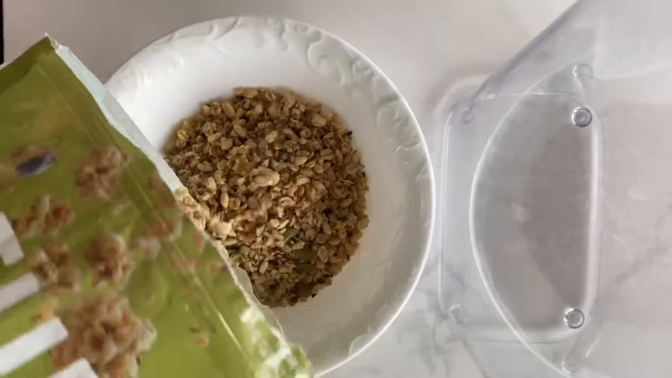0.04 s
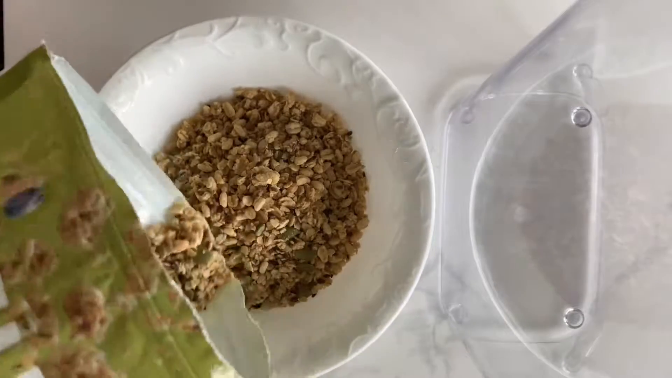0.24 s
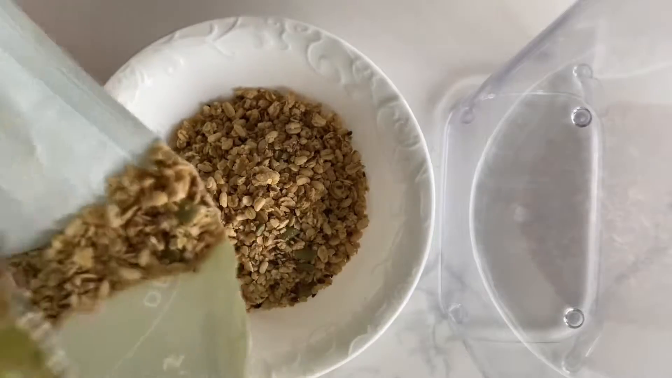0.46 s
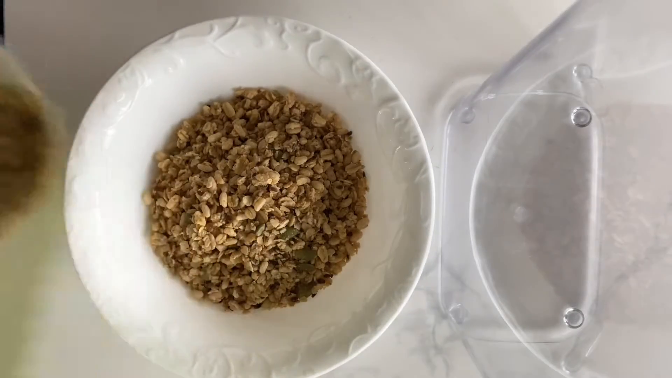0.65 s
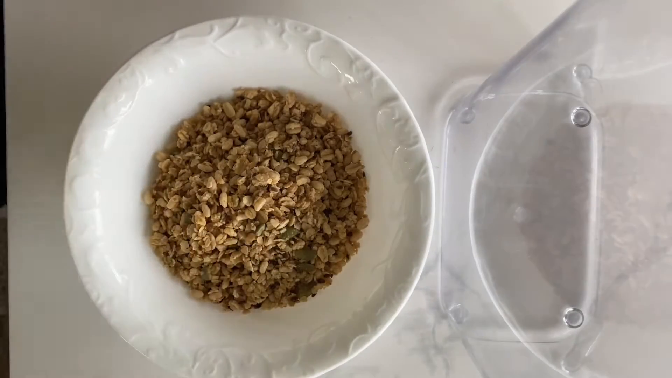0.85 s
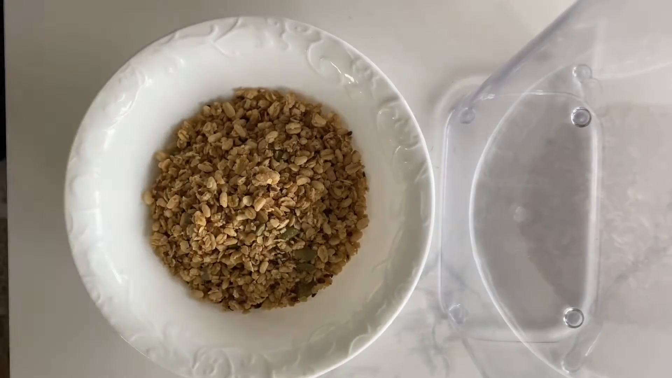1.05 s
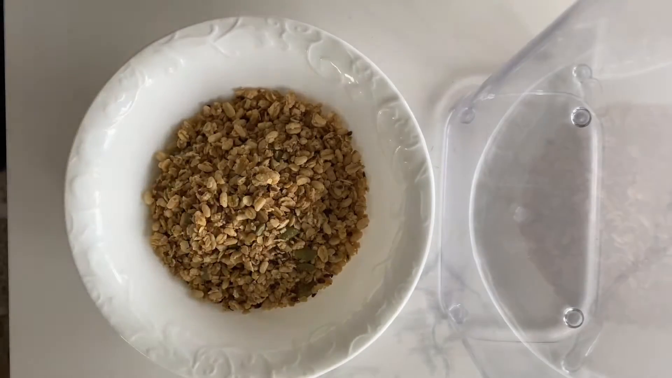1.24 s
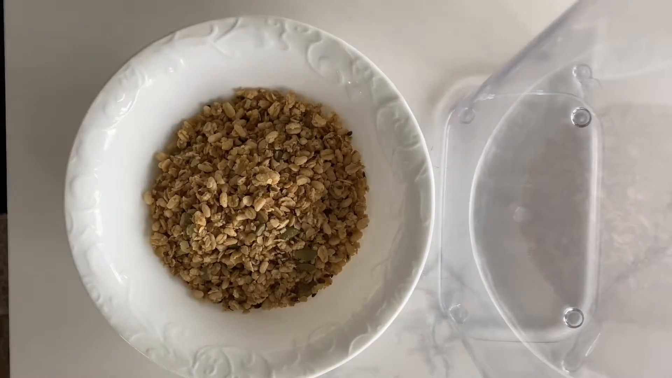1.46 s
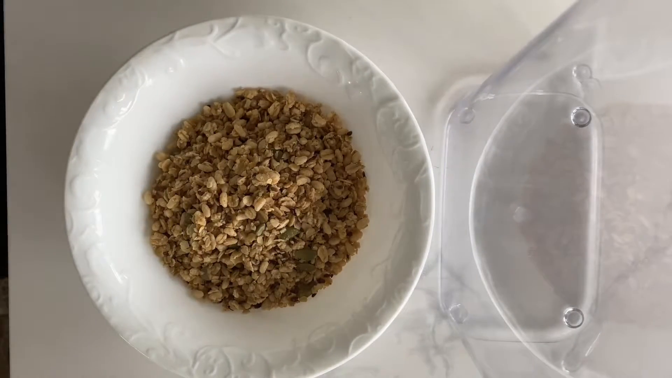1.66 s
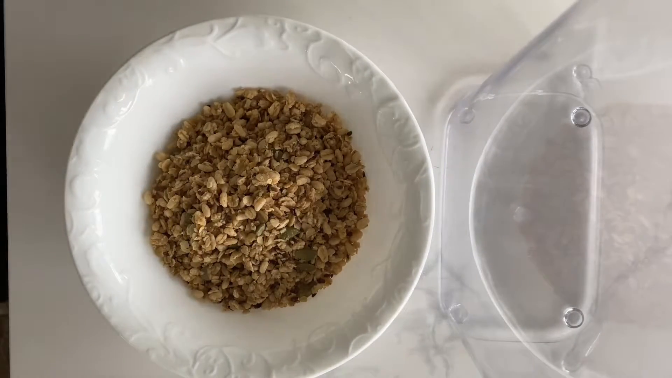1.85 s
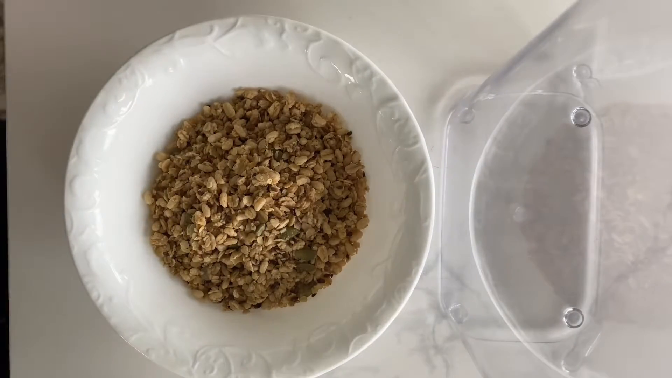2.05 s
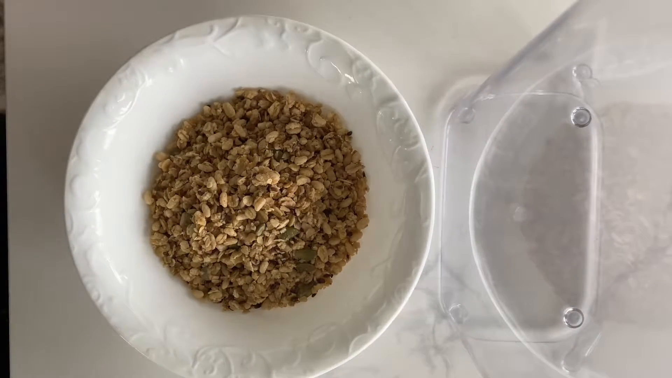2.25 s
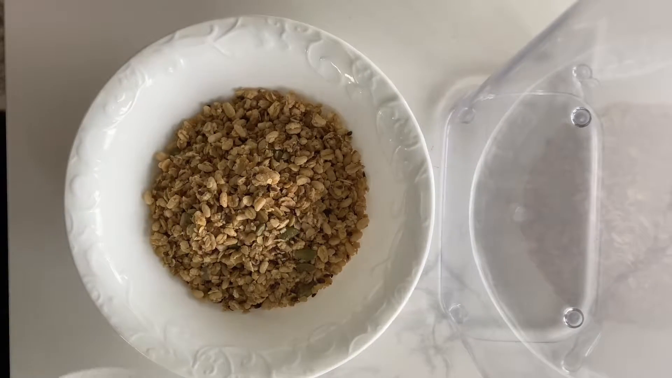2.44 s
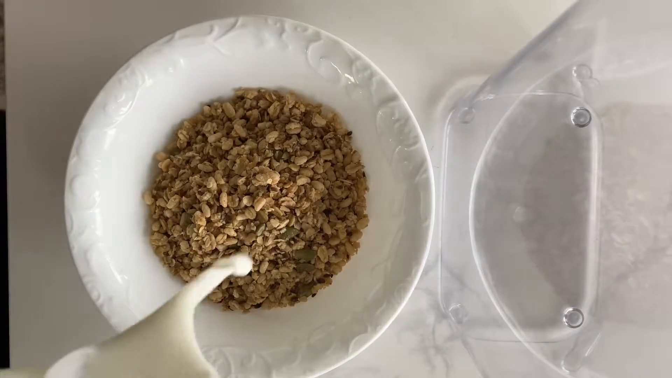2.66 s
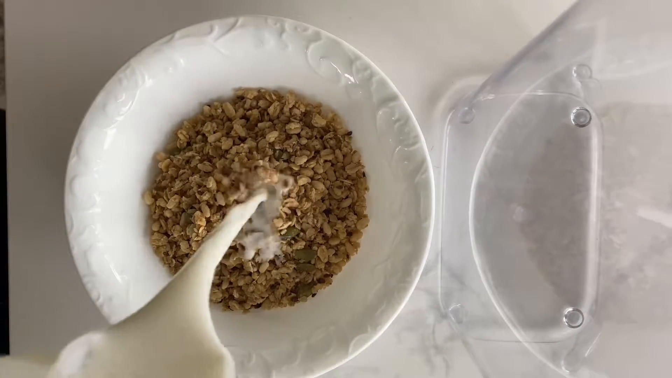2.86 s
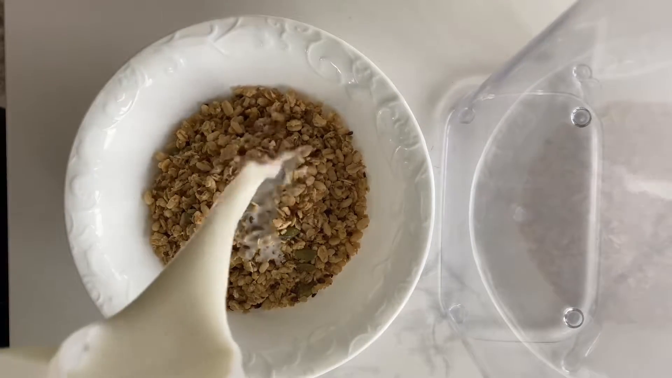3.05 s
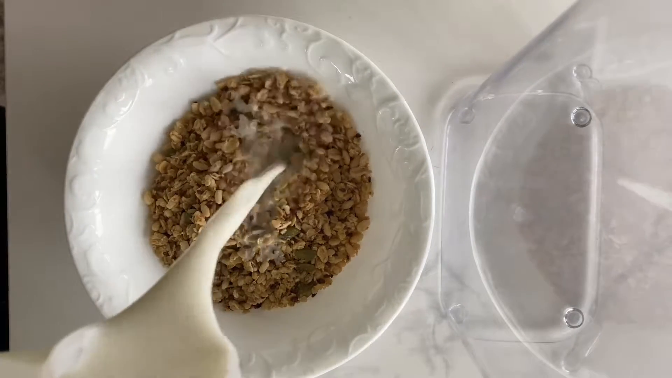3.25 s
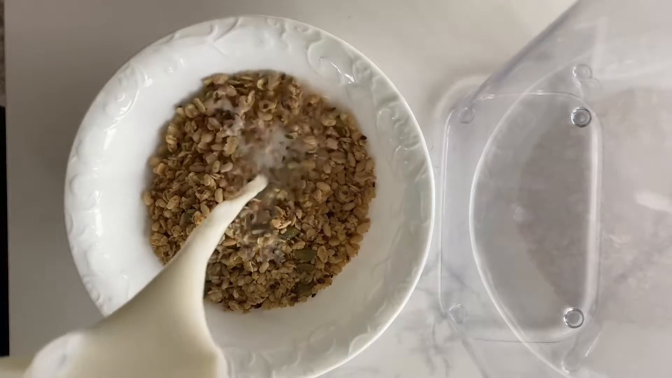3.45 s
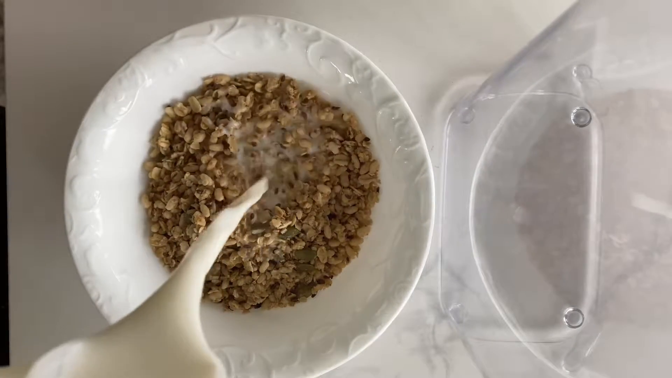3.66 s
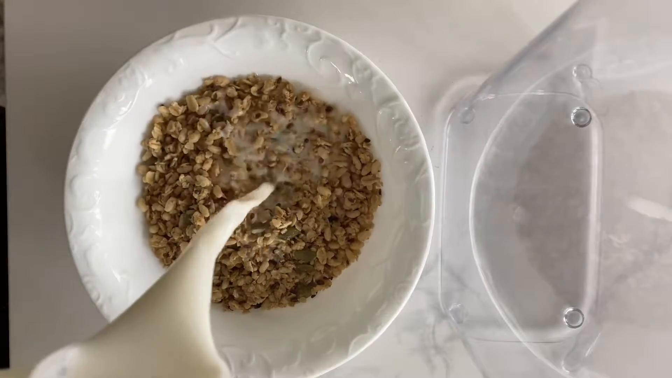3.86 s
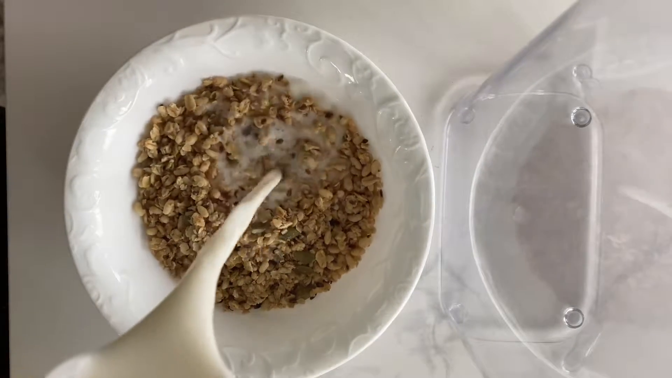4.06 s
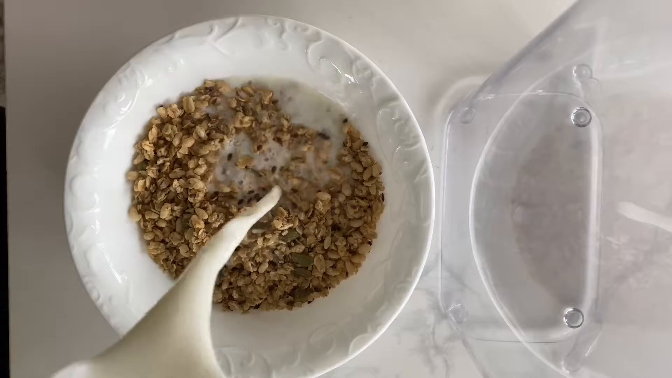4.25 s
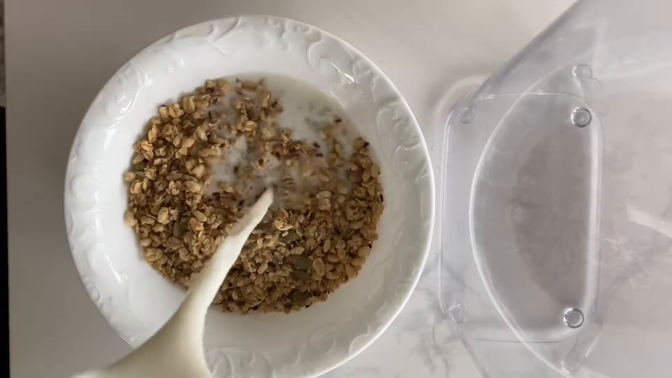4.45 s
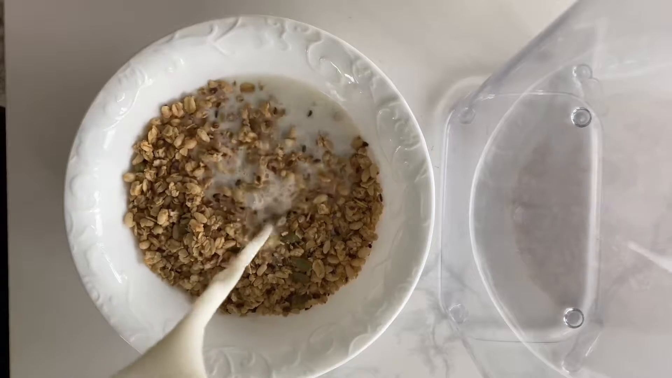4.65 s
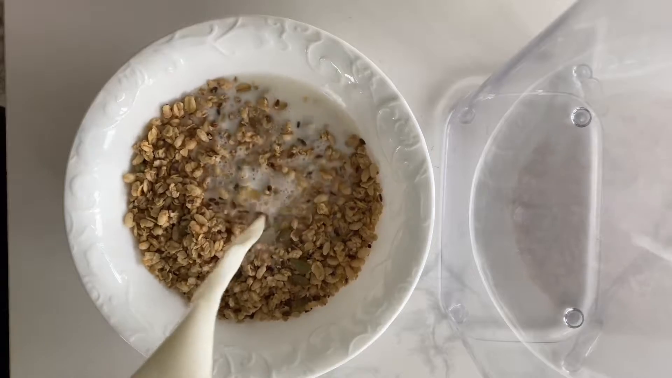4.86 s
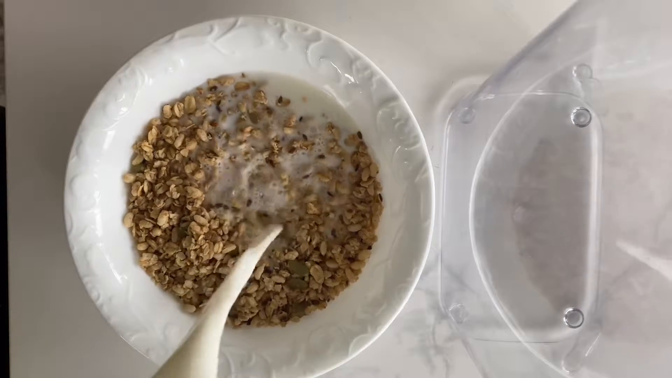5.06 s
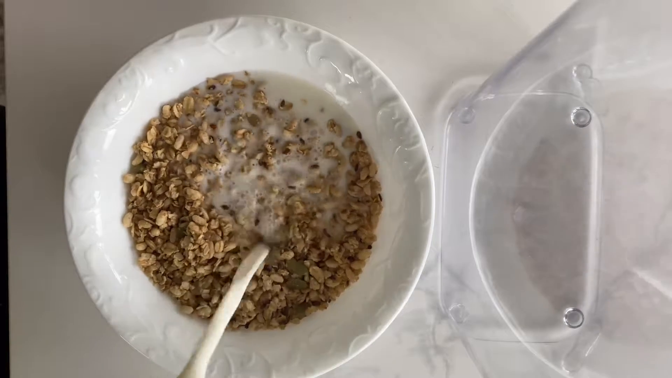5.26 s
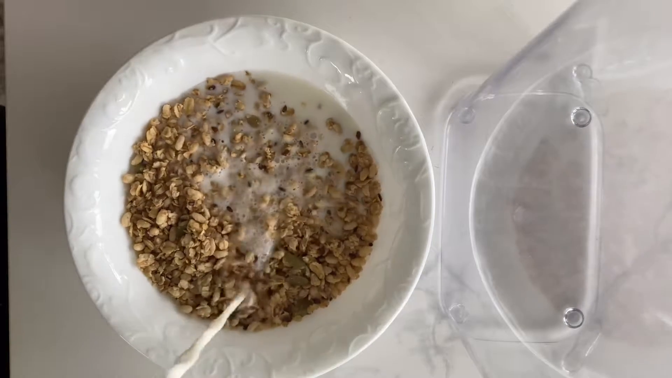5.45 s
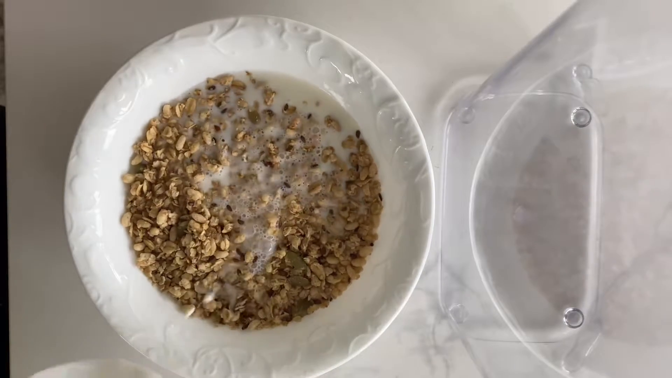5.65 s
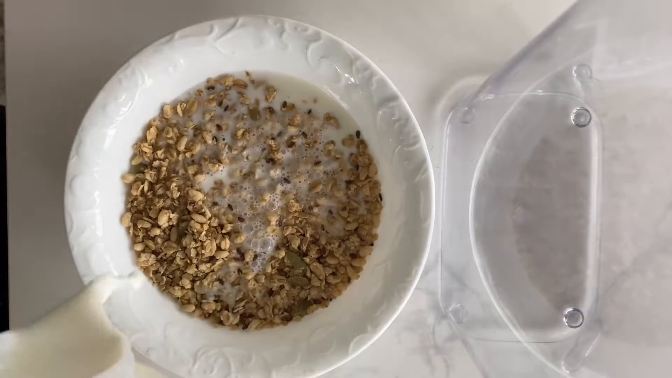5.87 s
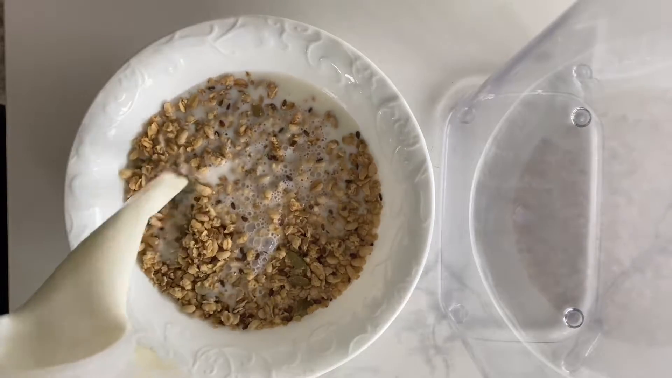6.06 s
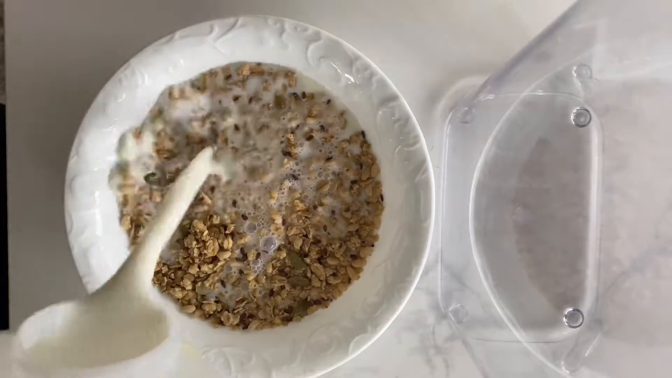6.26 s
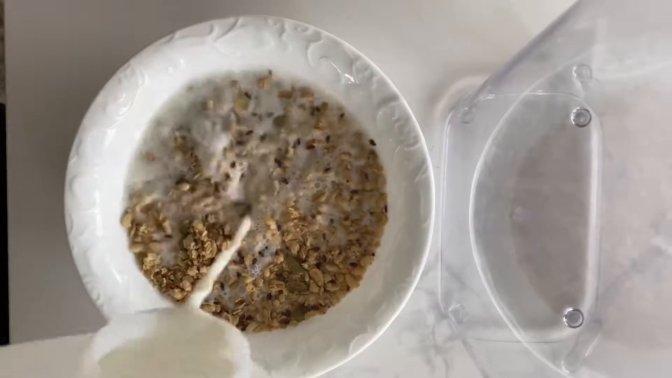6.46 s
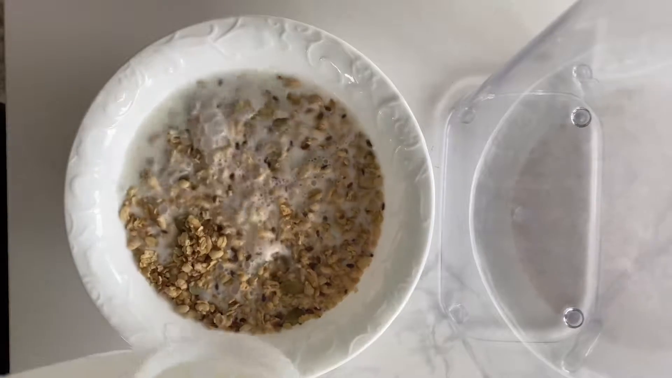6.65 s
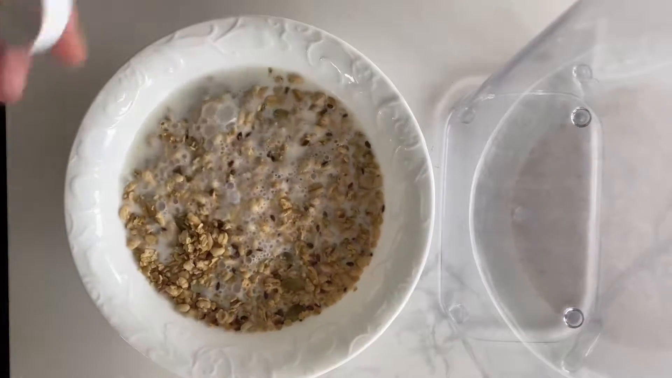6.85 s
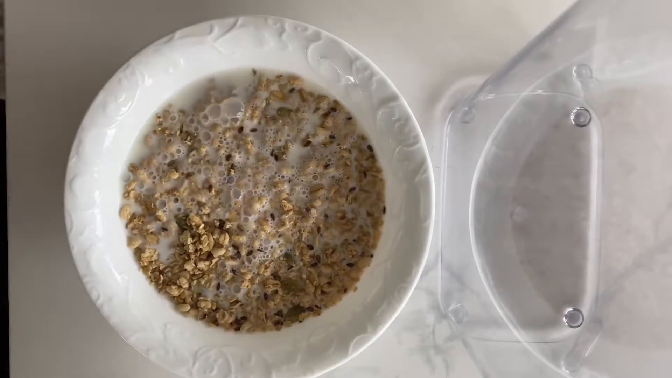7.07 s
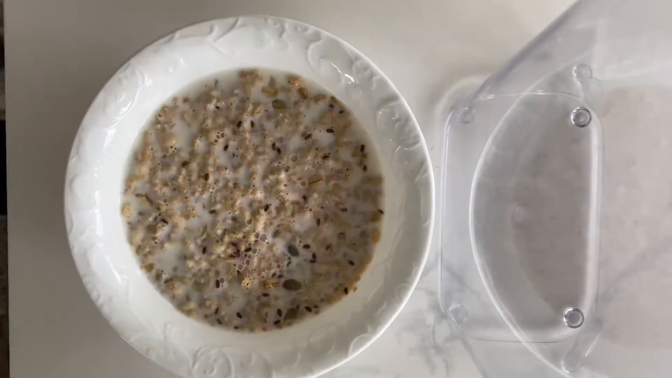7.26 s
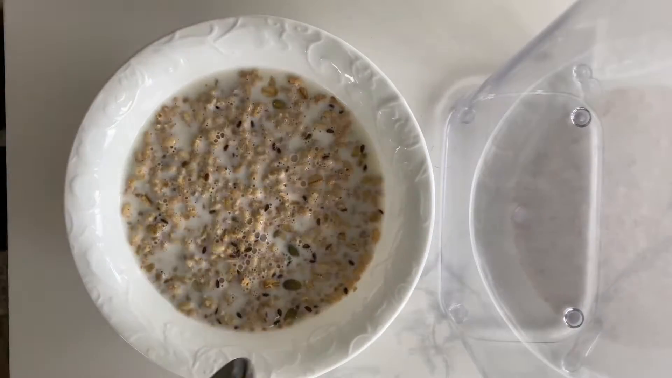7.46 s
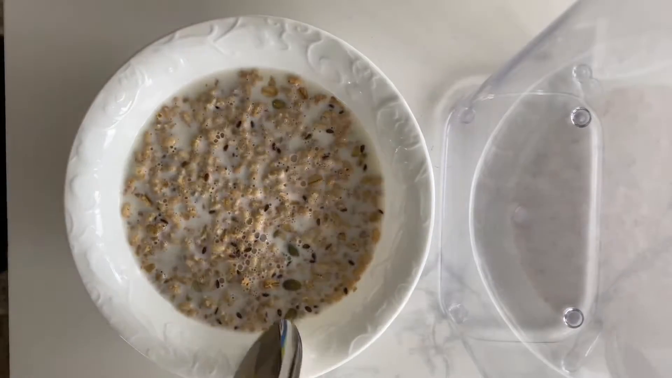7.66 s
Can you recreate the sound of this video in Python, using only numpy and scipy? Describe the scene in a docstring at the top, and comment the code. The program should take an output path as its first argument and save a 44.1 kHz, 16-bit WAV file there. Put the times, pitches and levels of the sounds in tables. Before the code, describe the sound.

Close dry rustle and crackly knocks of a granola bag, sudden quiet, milk bubbling through cereal in a bowl, then a quick clinking spoon.

```python
"""Granola rattles and thuds down a foil pouch, close by, then breaks off dead at 2 s; milk fizzes, bubbles and snaps
through flakes in a bowl in two pours; soft low bumps and a spoon's clinks end it, over room murmur and far engines.
Granola and milk are clouds of tiny noise grains, shaped in bands and colored by resonances of pouch, flakes and bowl.
Knocks, bubbles and bursts are short damped rings with noise; the spoon is a set of modes struck with a clatter.
Engines are faint sines, gliding or steady, the murmur is colored noise with hum; a two-port model makes it stereo."""
import sys
import numpy as np
from scipy import signal
from scipy.fft import rfft, irfft
from scipy.io import wavfile

SR = 44100
rng = np.random.default_rng(int(sys.argv[2]) if len(sys.argv) > 2 else 0)


def log_audio(samples):
    """Write samples as a 16-bit WAV file to the path given in sys.argv[1]."""
    # one column per channel
    frames = np.atleast_2d(samples).T
    # limit to full scale, then quantise
    limited = np.clip(frames, -1, 1)
    pcm = np.round(limited * 32767).astype(np.int16)
    wavfile.write(sys.argv[1], SR, pcm)


N = 340011
TIME = np.arange(N) / SR
FREQS = np.fft.rfftfreq(N, 1 / SR)
EDGE_HZ = 15950  # top of the whole mix
POUCH_END_S = 2.0
SILENT_DB = -200

# All levels below stand before the trims, resonances, echoes and stereo shading added further on.

# Color of the room murmur. Each row: frequency in Hz, density in dB per Hz, relative.
ROOM_COLOR = [(20, -21), (55, -1), (100, -3), (230, -4.5), (330, -17), (700, -20), (1500, -29.5),
              (4000, -34), (8000, -39.5), (15500, -53)]
# Drift of the room murmur and hum. Each row: time in seconds, gain in dB.
MURMUR_LEVEL = [(2.4, 1), (3.7, -0.5), (4.6, -3.5), (5.2, 0), (6.3, 2.5), (6.65, 1), (6.8, -2), (7.2, -1)]
# Faint kitchen hum. Each row: mean pitch in Hz, level in dB.
HUM_NOTES = [(167, -75), (203, -75), (263, -78)]
# Engines outside. Each row: start in seconds, length in seconds, pitch in Hz, climb in Hz per second, level in dB.
ENGINE_DRONES = [(0, 0.35, 215, 20, -57), (.41, 1.53, 169, 21.5, -52), (2, 0.85, 267.8, 0, -67),
                 (5.85, 0.86, 192.5, 4.5, -65.5)]
DRONE_FADE_S = 0.058

# The two microphone ports, three curves over frequency.
# Each row: frequency in Hz, phase in radians by which left leads.
LEFT_LEAD = [(0, 0), (300, .3), (650, 3.1), (1400, 4.3), (2200, 4.5), (3000, 7.3), (4000, 7.8), (5400, 9.5),
             (7000, 6.3), (9250, 3.1), (11100, 0), (13100, -3.1), (15200, -6.3)]
# Each row: frequency in Hz, left minus right in dB.
LEFT_LOUDER = [(60, 3), (200, 3), (700, 6), (1300, 6), (2400, 7), (4600, 8.5), (8000, 2.5), (9500, 0)]
# Each row: frequency in Hz, likeness of the two ports from 0 to 1.
PORT_LIKENESS = [(60, .8), (400, .7), (1200, .8), (2700, .5), (4500, .35), (6500, .6), (8200, .7),
                 (9300, .96)]

# Color of the granola in its pouch. Each row: frequency in Hz, density in dB per Hz, relative.
POUCH_COLOR = [(30, -5), (60, 11), (170, 2), (450, -11.5), (1000, -3), (1850, -6.5), (2700, -11),
               (3800, -8), (5400, -5), (8000, -15), (12000, -13), (15500, -19)]
# Granola sliding in the tilted pouch. Each row: start in seconds, hold in seconds, flow in dB, crispness in dB.
POUCH_SLIDES = [(0.02, 0.0093, -47.5, -1), (0.12, 0.0096, -50.5, -0.5), (0.255, 0.0083, -45, -2),
                (0.6, 0.22, -27, 1), (0.96, 0.082, -27.5, -10.5), (1.035, 0.027, -31.5, 1)]
# Jolts as the pouch is put down. Each row: start in seconds, hold in seconds, flow in dB, crispness in dB.
POUCH_JOLTS = [(1.436, 0.025, -23.5, -2), (1.523, 0.0025, -29.5, -18), (1.752, 0.0034, -32, -11.5)]
# Resonance of the air in the pouch, dropping as the granola slides back. Each row: time in seconds, pitch in Hz.
POUCH_AIR_PITCH = [(0.3, 1850), (0.799, 1750), (0.98, 1050)]
# Clumps landing and creases snapping in the pouch.
# Each row: start in seconds, thud in dB, pitch in Hz, cycles to swell, crack in dB.
POUCH_CLUMPS = [(0.030, -30, 1853, 1.5, -31), (0.256, -33, 1730, 1.3, -33), (0.489, -33.5, 840, 0.42, -47),
                (0.772, -10, 1360, 0.8, -10), (0.7872, -14, 1230, 0.39, -8.5), (1.011, -28, 1080, 2, -22),
                (1.0605, -12, 930, 1.5, -23.5), (1.2698, -26.5, 1812, 0.75, -24),
                (1.3028, -21, 907, 1.3, -8.5), (1.305, -28, 201, 0.24, -48.5),
                (1.433, -15.5, 2010, 0.86, -12), (1.4428, -17, 1980, 0.86, -4),
                (1.4625, -10, 1150, 1.3, -11), (1.524, -18, 410, 1.2, -25.5),
                (1.6465, -10, 885, 1.26, -26.5), (1.7465, -15, 1060, 1.3, -25),
                (1.7539, -13.5, 1040, 0.83, -19), (1.8154, -18, 1010, 1, -25.5),
                (1.9028, -17.5, 1040, 0.54, -41), (1.957, -25, 1190, 0.64, -42)]
HANDLING_DB = -59  # faint steady rustle of the held pouch
# The low thuds gain THUD_LAG dB less for each dB of flow above a gentle one.
THUD_LAG, GENTLE_DB = .17, -56.5

# Color of the milky drops. Each row: frequency in Hz, density in dB per Hz, relative.
MILK_COLOR = [(400, 2.5), (850, -15), (1400, -5.5), (2100, -0.5), (3300, -5.5), (4800, -0.5), (7000, -4),
              (8500, -1.5), (11500, -1.5), (15500, -7.5)]
# The two pours on the flakes. Each row: time in seconds, flow in dB, fizz in dB against the flow.
POUR_ONE = [(2.763, -64.5, 10), (2.95, -54.5, -1), (3.12, -54.5, 0), (3.29, -46.5, 1.5), (3.58, -54.5, 0.5),
            (3.92, -57, -1), (4.05, -49, -3.5), (4.25, -59, 2.5), (4.41, -53, 0.5), (4.9, -56, -5),
            (5.44, -51, 1), (5.62, -62, 5.5), (5.801, -86.5, 5)]
POUR_TWO = [(5.961, -73, 0.5), (6.05, -53, 3.5), (6.17, -50.5, -10), (6.24, -52, -1), (6.42, -49.5, -6),
            (6.57, -56, 0), (6.71, -72, -25), (6.92, -83, -11)]
POURS = POUR_ONE + POUR_TWO
# Each pour's gurgle starts low on dry flakes and comes up as they get wet.
DRY_DB, WETTING_S = -13, 0.36
# Lowest resonance of the wet gaps between flakes. Each row: time in seconds, pitch in Hz.
GAP_PITCH = [(2.77, 1240), (2.96, 1410), (3.2, 1340), (4.0, 1217), (5.35, 943), (5.62, 1350), (6.2, 850)]
# Resonance of the hole the stream digs as it moves over the heap. Each row: time in seconds, pitch in Hz.
CAVITY_PITCH = [(2.87, 2830), (3.08, 2550), (3.17, 1310), (5.5, 1460), (6.05, 2030), (6.45, 1950),
                (6.75, 1700)]
# First milk hissing on the dry heap. Each row: time in seconds, level in dB.
HISS_LEVEL = [(2.764, -67), (2.87, -52.5), (3.05, -54), (3.3, -46), (3.6, -67)]
# Air pockets bursting in the milk. Each row: start in seconds, level in dB, pitch in Hz, cycles to swell.
AIR_PLOPS = [(3.042, -37, 2870, 5.6), (3.323, -38, 1370, 1.9), (3.341, -33.5, 3930, 1.9),
             (3.683, -37, 1510, 2.6), (3.737, -33.5, 1406, 3.1), (4.002, -20, 1650, 0.44),
             (4.142, -37, 2010, 2.1), (4.165, -23.5, 2020, 0.43), (4.1806, -26, 1470, 0.53),
             (4.366, -31, 2240, 0.5), (4.42, -39, 1460, 1.2), (4.4998, -29, 3330, 0.58),
             (4.533, -34.5, 3880, 5.5), (4.69, -31, 1370, 1), (4.711, -34, 1490, 1.1),
             (4.852, -40.5, 2050, 2.8), (4.943, -37.5, 3860, 4.8), (5.0309, -25, 1930, 1.1),
             (5.174, -32, 2600, 0.52), (5.182, -26.5, 2410, 0.84), (5.185, -29, 1420, 1.5),
             (5.261, -42, 1530, 1.2), (5.349, -31, 3300, 1.7), (5.353, -32, 1480, 0.89),
             (6.122, -30, 1940, 2.6), (6.152, -27, 1930, 2.1), (6.169, -35, 890, 5.7),
             (6.326, -27, 1970, 1.1), (6.3598, -16, 1664, 2.24), (6.411, -31, 1920, 1),
             (6.455, -24.5, 1920, 1.2), (6.4619, -28.5, 804, 1.5), (6.509, -34, 796, 1.4),
             (6.54, -31.5, 1650, 2.2), (6.6276, -30, 1473, 0.58), (6.7714, -54, 1690, 2.36),
             (6.825, -56, 1910, 2.9)]
# Dry flakes snapping as the milk reaches them. Each row: start in seconds, level in dB.
FLAKE_SNAPS = [(3.1954, -20.5), (3.3326, -25.5), (3.815, -28.5), (3.9564, -27), (4.003, -30), (4.141, -20),
               (4.444, -21.5), (4.501, -27.5), (4.667, -25), (4.7152, -25.5), (4.7682, -31), (4.806, -22),
               (5.4383, -25), (5.529, -27.5), (6.115, -23), (6.1528, -18.5), (6.4307, -25.5)]
SNAP_HZ = 11000  # center of the random tick pitches
SPRAY_S, CRUMBLE_S = .010, .0022  # decay of the spray of a plop, of the crumbs of a snap
STIR_DB = -30.5  # fizz stirred up around each plop and snap, against its own level
# The stream splashes on the bowl wall. Each row: peak time in seconds, level in dB, pitch in Hz.
WALL_SPLASHES = [(6.168, -30, 5260)]
# Soaked flakes go on crackling softly. Each row: time in seconds, level in dB.
SOAK_LEVEL = [(5.6, -85.5), (7.2, -72), (7.45, -88)]
# Ringing of the air in the bowl. Each row: pitch in Hz, width in Hz, gain in dB.
BOWL_RINGS = [(842, 195, 4.5), (2450, 380, -8.5), (3500, 580, -11)]

# Soft low bumps. Each row: start in seconds, level in dB, pitch in Hz, length in seconds.
LOW_BUMPS = [(7.288, -60.5, 45.5, 0.15), (7.544, -35.5, 57, 0.045), (7.589, -37, 41.5, 0.11)]
# The spoon lands and bounces. Each row: start in seconds, level in dB.
SPOON_HITS = [(7.6447, 1), (7.648, -2), (7.6608, -1.5), (7.67, -8.5)]
# What the spoon and dish ring with. Each row: pitch in Hz, level in dB, time to fall 60 dB in seconds.
SPOON_MODES = [(1197, -9, 0.035), (1480, -11, 0.076), (3240, -9, 0.052), (3980, -15, .035), (4105, 1, 0.02),
               (5330, -8.5, .07), (7080, -4, 0.039), (9860, 1.5, 0.069), (10360, -8, .04), (13810, -4, .05),
               (14490, -2, 0.048), (15350, -6, .05)]
# Color of the clatter on the hard dish. Each row: frequency in Hz, density in dB per Hz, relative.
CLATTER_COLOR = [(250, -8.5), (620, 7.5), (1400, 1), (2300, -8), (4000, 4), (7100, -5.5), (9000, -15),
                 (10400, -1), (15000, -6)]


def amp(db):
    """Decibels to gain."""
    return 10 ** (np.asarray(db) / 20)


def evened(x):
    """Scales to rms 1."""
    return x / np.sqrt(np.mean(x ** 2) + 1e-20)


def peaked(x):
    """Scales to peak 1."""
    return x / abs(x).max()


def read(points, hz):
    """Reads a table on a log-frequency axis."""
    f, value = np.transpose(points)
    return np.interp(np.log(hz + 1), np.log(f + 1), value)


def follow(rows, outside=None):
    """Draws a two-column table as a curve over time; beyond its ends it holds, or takes the outside value."""
    return np.interp(TIME, *np.transpose(rows), left=outside, right=outside)


def add(mix, s, sound):
    """Mixes a sound in at time s."""
    part = mix[max(round(s * SR), 0):][:len(sound)]
    part += sound[:len(part)]


def wander(per_s):
    """Random drift in straight lines between knots of rms 1."""
    knots = rng.standard_normal(int(N / SR * per_s) + 3)
    return np.interp(TIME * per_s, np.arange(len(knots)), knots)


def band(x, lo_hz, hi_hz, order=3):
    """Causal band-pass."""
    edges = [lo_hz, min(hi_hz, SR / 2 - 1)]
    return signal.sosfilt(signal.butter(order, edges, "band", fs=SR, output="sos"), x)


def coloured(x, spectrum, size=4096):
    """Causal minimum-phase coloring, so that clicks keep their sharp fronts."""
    log_gain = np.log(amp(read(spectrum, abs(np.fft.fftfreq(size, 1 / SR)))))
    response = np.fft.ifft(np.exp(np.conj(signal.hilbert(log_gain)))).real
    return signal.oaconvolve(x, response[:size // 2])[:len(x)]


def resonate(x, track, width_hz, waver=0):
    """A resonance of gain 1 that follows a pitch curve, wavering by a share of its pitch."""
    hz = follow(track) * (1 + waver * wander(22))
    turn = np.exp(2j * np.pi * np.cumsum(hz) / SR)
    r = np.exp(-np.pi * width_hz / SR)
    # Shift the pitch down to 0 Hz, smooth there, and shift back up.
    smooth = signal.lfilter([1 - r], [1, -r], x / turn + 1e-18)
    return 2 * (turn * smooth).real


def burst(decay_s, size=2048):
    """A puff of noise that dies away."""
    return rng.standard_normal(size) * np.exp(-np.arange(size) / SR / decay_s)


def blip(hz, cycles, rise, size=2048):
    """A ring with an envelope of peak 1 that swells for a few cycles, then dies, climbing in pitch if rise > 0."""
    age = np.arange(size) / SR * hz / cycles
    swell = (age * np.exp(1 - age)) ** 2
    return swell * np.sin(2 * np.pi * cycles * age * (1 + rise * (np.minimum(age, 4) - 2)))


def crackle(per_s, spread_db, decay_s, cap, clump_db, clumps_per_s, width, patch_db, count=16):
    """Tiny contacts at many pitches, in clumps of changing color; most are small, a few large."""
    out, clumping = np.zeros(N), clump_db * wander(clumps_per_s)
    reach = 1 + width
    for hz in np.geomspace(400, 14000, count):
        grain = np.sqrt(hz) * evened(band(burst(decay_s, size=384), hz / reach, hz * reach, order=2))
        when, luck = rng.random((2, int(per_s * N / SR / count)))
        at = (when * N).astype(int)
        # Each pitch draws its own level for every patch of time, which shifts the color.
        patches = patch_db * rng.standard_normal(int(N / SR * clumps_per_s) + 1)
        patch = patches[(at / SR * clumps_per_s).astype(int)]
        size_db = spread_db * np.minimum(-np.log(1 - luck), cap)
        strength = amp(clumping[at] + patch + size_db)
        out += signal.oaconvolve(np.bincount(at, strength, N), grain)[:N]
    return evened(out)


def flowing(grains, bass, flow, treble, low_hz, mid_hz, high_hz, low_db, mid_db, high_db):
    """The bass, middle and treble of the grains each follow their own gain."""
    low = amp(low_db) * bass * evened(band(grains, low_hz, mid_hz))
    middle = amp(mid_db) * flow * evened(band(grains, mid_hz, high_hz))
    high = amp(high_db) * treble * evened(band(grains, high_hz, SR / 2))
    return low + middle + high


def ports(left, other):
    """The right port hears the left one's sound shifted and shaded, plus a part of its own."""
    same = np.clip(read(PORT_LIKENESS, FREQS), 0, 1)
    right = same * rfft(left) + np.sqrt(1 - same ** 2) * rfft(other)
    shading = amp(-read(LEFT_LOUDER, FREQS)) * np.exp(-1j * read(LEFT_LEAD, FREQS))
    return np.array([left, irfft(right * shading, N)])


def tail(low_t60, high_t60, size=32768):
    """Diffuse kitchen echo of energy 1; the treble dies first."""
    hz, t, z = signal.stft(rng.standard_normal(size), SR, nperseg=256)
    t60 = read([(300, low_t60), (12000, high_t60)], hz)[:, None]
    decay = np.exp(-np.log(1000) * t / t60) * (t > .004)
    echo = signal.istft(z * decay, SR, nperseg=256)[1]
    return echo / np.linalg.norm(echo)


def kitchen(source, wet_db):
    """Each port gets its own share of a scattered source, and a short tail from the walls."""
    shares = []
    for x in (source(), source()):
        echo = signal.oaconvolve(x, tail(0.37, 0.28))[:N]
        shares.append(x + amp(wet_db) * echo)
    return ports(*shares)


def room_tone(level_db=-64):
    """Low murmur of the kitchen, with a little hiss and a wavering hum."""
    murmur = [amp(level_db) * evened(coloured(rng.standard_normal(N), ROOM_COLOR)) for _ in range(2)]
    hum = np.zeros(N)
    for hz, db in HUM_NOTES:
        level = amp(db + 3 * wander(4))
        pitch_hz = hz + 5 * wander(8)
        hum += level * np.sin(2 * np.pi * np.cumsum(pitch_hz) / SR)
    return ports(murmur[0] + hum, murmur[1]) * amp(follow(MURMUR_LEVEL))


def traffic():
    """Each engine drone is a single faint sine, gliding or steady."""
    out = np.zeros(N)
    for s, length, hz, climb, db in ENGINE_DRONES:
        t = np.arange(0, length, 1 / SR)
        fade = np.clip(np.minimum(t, length - t) / DRONE_FADE_S, 0, 1)
        add(out, s, amp(db) * fade * np.sin(2 * np.pi * (hz + climb * t / 2) * t))
    return ports(out, out)


def tumble(rows, rise_db_per_s, fall_db_per_s, trickle_db, trickle_db_per_s):
    """Each movement builds, holds and stops, leaving a trickle; gives the gains of the flow and of its treble."""
    flow, treble = np.zeros(N), np.zeros(N)
    for s, hold_s, db, crisp_db in rows:
        early, late = np.maximum(s - TIME, 0), np.maximum(TIME - s - hold_s, 0)
        # A fast fall hands over to a slow trickle.
        dying_db = np.maximum(-fall_db_per_s * late, trickle_db - trickle_db_per_s * late)
        gain = amp(np.maximum(db - rise_db_per_s * early + dying_db, SILENT_DB))
        flow, treble = np.hypot(flow, gain), np.hypot(treble, gain * amp(crisp_db))
    return flow, treble


def thuds(flow):
    """Gain of the low thuds, which grow more slowly than the rattle."""
    return flow * (flow / amp(GENTLE_DB)) ** -THUD_LAG


def pops(rows, crack_hz, puff_db, crack_db, puff_s, crack_s):
    """Each pop is a short hollow knock, a puff around its pitch and a bright crack."""
    out = np.zeros(N)
    for s, db, hz, cycles, top_db in rows:
        puff = peaked(band(burst(puff_s), hz / 2.4, hz * 1.4))
        crack = peaked(band(burst(crack_s), crack_hz / 8.1, crack_hz * 2.0, order=2))
        knock = blip(hz, cycles, 0) + amp(puff_db) * puff
        add(out, s, amp(db) * knock + amp(top_db + crack_db) * crack)
    return out


def granola(rush_db=-16, air_db=-3):
    """Thousands of flakes rattle and rush along the foil; clumps thud as the pouch is put down."""
    rattle = crackle(per_s=4300, spread_db=3.8, decay_s=.0005, cap=4,
                     clump_db=1.3, clumps_per_s=120, width=.5, patch_db=2.3)
    flakes = coloured(rattle + amp(rush_db) * rng.standard_normal(N), POUCH_COLOR)
    in_pouch = flakes + amp(air_db) * resonate(flakes, POUCH_AIR_PITCH, width_hz=440)

    flow, treble = tumble(POUCH_SLIDES, rise_db_per_s=417.5, fall_db_per_s=156.0,
                          trickle_db=-6.0, trickle_db_per_s=61.0)
    flow = np.hypot(flow, amp(HANDLING_DB))
    slide = flowing(in_pouch, thuds(flow), flow, treble, low_hz=40, mid_hz=755, high_hz=2925,
                    low_db=-0.5, mid_db=1, high_db=-1.0)

    flow, treble = tumble(POUCH_JOLTS, rise_db_per_s=3603, fall_db_per_s=203,
                          trickle_db=-16.5, trickle_db_per_s=32.0)
    settle = flowing(flakes, thuds(flow), flow, treble, low_hz=60.6, mid_hz=783, high_hz=3540,
                     low_db=6.5, mid_db=1.0, high_db=-5.0)
    clumps = pops(POUCH_CLUMPS, crack_hz=6050, puff_db=-7, crack_db=-4.5, puff_s=0.005, crack_s=0.0034)
    return slide + settle + clumps


def pouring():
    """Flow of the milk, its fizz and its gurgle over time, all in dB."""
    s, flow, fizz = np.transpose(POURS)
    second_s = POUR_TWO[0][0]
    age = TIME - np.where(TIME < second_s, POUR_ONE[0][0], second_s)
    flow_db = np.interp(TIME, s, flow, left=SILENT_DB, right=SILENT_DB)
    fizz_db = flow_db + np.interp(TIME, s, fizz)
    gurgle_db = flow_db + DRY_DB * np.clip(1 - age / WETTING_S, 0, 1)
    return flow_db, fizz_db, gurgle_db


def flurries(rows, level_db, build_s, calm_s):
    """Gain of the fizz that gathers and calms around each burst or snap."""
    t = np.arange(-SR // 4, SR // 4) / SR
    kicks = np.zeros(N)
    for s, db, *_ in rows:
        add(kicks, s, amp([db + level_db]))
    return signal.oaconvolve(kicks, np.exp(np.minimum(t / build_s, -t / calm_s)), "same")


def hollow(x, damping):
    """The wet gaps resonate at their lowest pitch and pass little below it."""
    hz, t, z = signal.stft(x, SR, nperseg=256)
    ratio = 1j * hz[:, None] / np.interp(t, *np.transpose(GAP_PITCH))
    high_pass = ratio ** 2 / (ratio ** 2 + damping * ratio + 1)
    return signal.istft(z * high_pass ** 2, SR, nperseg=256)[1][:N]


def bubble(hz, cycles, rise, size=2048):
    """A damped ring whose pitch climbs as it dies."""
    age = np.arange(size) / SR * hz / cycles
    return np.exp(-age) * np.sin(2 * np.pi * cycles * age * (1 + rise * np.minimum(age, 4)))


def bubbles(per_s, level_db, spread_db, cycles, high_hz, count=600):
    """Small bubbles ring between the flakes, at random pitches from that of the gaps up to high_hz."""
    s, flow, _ = np.transpose(POURS)
    out = np.zeros(N)
    wait, kinds, sizes = rng.random((3, count))
    starts = s[0] + np.cumsum(2 * wait) / per_s
    for at, kind, size in zip(starts, kinds, sizes):
        if at < s[-1]:
            lowest_hz = np.interp(at, *np.transpose(GAP_PITCH))
            hz = lowest_hz * (high_hz / lowest_hz) ** kind
            db = np.interp(at, s, flow) + level_db + spread_db * size ** 2
            add(out, at, amp(db) * bubble(hz, cycles, 0.013))
    return out


def hiss(lo_hz=1500, hi_hz=6500):
    """Dry flakes drink the first milk with a fine hiss that rings in the hole under the stream."""
    fine = crackle(per_s=8000, spread_db=3, decay_s=.0004, cap=3,
                   clump_db=1, clumps_per_s=60, width=.35, patch_db=2)
    fine = band(fine, lo_hz, hi_hz, order=2)
    fine = evened(fine + 2.2 * resonate(fine, CAVITY_PITCH, width_hz=560, waver=.04))
    return fine * amp(follow(HISS_LEVEL, SILENT_DB))


def plops(rise=0.046, spray_db=-12, crack_db=-15, crack_hz=4600, crack_s=0.0034):
    """An air pocket bursts with one short rising blip, a crack and a little spray."""
    out = np.zeros(N)
    for s, db, hz, cycles in AIR_PLOPS:
        spray = peaked(band(burst(SPRAY_S), hz / 2.83, hz * 1.84, order=2))
        crack = peaked(band(burst(crack_s), crack_hz / 2, crack_hz * 2, order=2))
        add(out, s, amp(db) * (blip(hz, cycles, rise) + amp(spray_db) * spray + amp(crack_db) * crack))
    return out


def snaps(cycles=3.6, crumble_db=-6, crumble_hz=1500):
    """A flake breaks with one very short bright tick and a crumbling burst of noise."""
    out = np.zeros(N)
    for s, db in FLAKE_SNAPS:
        crumble = peaked(band(burst(CRUMBLE_S), crumble_hz, 8000, order=2))
        tick = blip(SNAP_HZ * rng.uniform(0.747, 1.284), cycles, 0)
        add(out, s, amp(db) * (tick + amp(crumble_db) * crumble))
    return out


def splashes(drops, reach, build_db_per_s, fall_db_per_s):
    """A splash is a narrow band of drops that swells and breaks off; a harder one comes and goes faster."""
    out = np.zeros(N)
    for s, db, hz in WALL_SPLASHES:
        # The given rates hold for a splash at GENTLE_DB.
        age = (TIME - s) * np.sqrt(amp(db - GENTLE_DB))
        level_db = db + np.maximum(np.minimum(build_db_per_s * age, -fall_db_per_s * age), -150)
        out += amp(level_db) * evened(band(drops, hz / (1 + reach), hz * (1 + reach), order=2))
    return out


def in_bowl(x):
    """Adds the ringing of the air in the bowl."""
    rings = [amp(db) * signal.lfilter(*signal.iirpeak(hz, hz / width, fs=SR), x) for hz, width, db in BOWL_RINGS]
    return x + sum(rings)


def milk(cavity_db=-1):
    """The stream fizzes through dry flakes, with bubbles, bursting air pockets, snaps and splashes."""
    wet_grains = crackle(per_s=3400, spread_db=3.7, decay_s=.0005, cap=3.8,
                         clump_db=2.3, clumps_per_s=40, width=.28, patch_db=2.8)
    drops = coloured(wet_grains, MILK_COLOR)
    stirred = flurries(AIR_PLOPS + FLAKE_SNAPS, level_db=STIR_DB, build_s=0.006, calm_s=0.0138)
    flow, fizz, gurgle = (np.hypot(amp(db), stirred) for db in pouring())
    stream = flowing(drops, gurgle, flow, fizz, low_hz=378.0, mid_hz=1147, high_hz=3760,
                     low_db=0.0, mid_db=-1.5, high_db=2)
    stream = hollow(stream, damping=1.0)
    stream = stream + bubbles(per_s=135, level_db=1, spread_db=10.5, cycles=5.5, high_hz=3700)
    stream = stream + amp(cavity_db) * resonate(stream, CAVITY_PITCH, width_hz=130, waver=.07)

    bursts = band(plops() + snaps(), 550, EDGE_HZ, order=2)
    splash = splashes(drops, reach=0.21, build_db_per_s=138, fall_db_per_s=147.5)
    soak = evened(band(drops, 6500, EDGE_HZ, order=2)) * amp(follow(SOAK_LEVEL, SILENT_DB))
    return in_bowl(stream + bursts) + splash + soak + hiss()


def bumps():
    """A few soft low bumps, each a slow sine under a half-sine swell."""
    out = np.zeros(N)
    for s, db, hz, length in LOW_BUMPS:
        t = np.arange(0, length, 1 / SR)
        add(out, s, amp(db) * np.sin(np.pi * t / length) * np.sin(2 * np.pi * hz * t))
    return ports(out, out)


def spoon(ring_db=-19, clatter_db=-11, clatter_s=0.0016, buzz_db=-19, buzz_s=0.019, size=8192):
    """Each contact is a hard clatter with a brief buzz, and sets spoon and dish ringing in a new blend."""
    t, out = np.arange(size) / SR, np.zeros(N)
    hz, level, t60 = np.transpose(SPOON_MODES)[:, :, None]
    for s, db in SPOON_HITS:
        phase, blend = rng.random((2, len(SPOON_MODES), 1))
        mode_db = level + 6 * (blend - .5) - 60 * t / t60
        ring = (amp(mode_db) * np.sin(2 * np.pi * (hz * t + phase))).sum(0)
        clatter = amp(clatter_db) * burst(clatter_s, size=size) + amp(buzz_db) * burst(buzz_s, size=size)
        add(out, s, amp(db) * (amp(ring_db) * ring + coloured(clatter, CLATTER_COLOR)))
    return out


def scene():
    """All sources together; the pouch breaks off along with its echo."""
    pouch_gate = np.clip((POUCH_END_S - TIME) * 500, 0, 1)  # closes over 2 ms
    pouch = pouch_gate * kitchen(granola, wet_db=-7)
    bowl = kitchen(milk, wet_db=-8.5) + kitchen(spoon, wet_db=-9.5)
    return room_tone() + traffic() + pouch + bowl + bumps()


def record(dry):
    """Rolls the whole mix off steeply at EDGE_HZ."""
    low_pass = signal.firwin(301, EDGE_HZ, window=("kaiser", 8), fs=SR)
    return signal.oaconvolve(dry, low_pass[None], "same")


dry = scene()
out = record(dry)
log_audio(out)
```